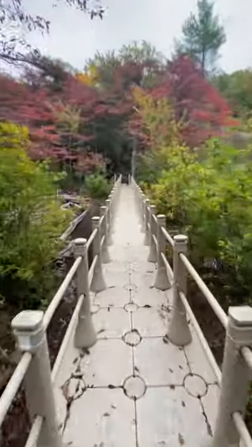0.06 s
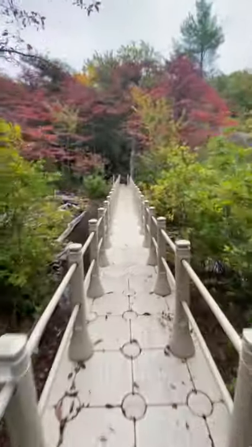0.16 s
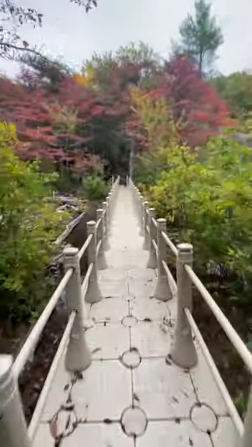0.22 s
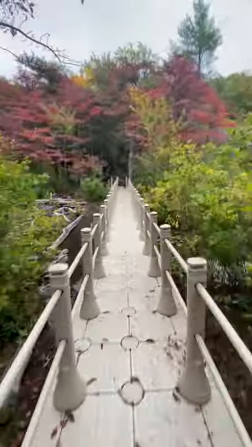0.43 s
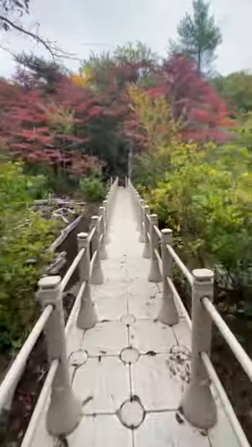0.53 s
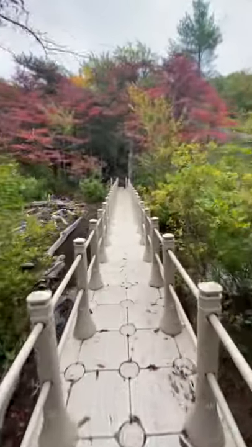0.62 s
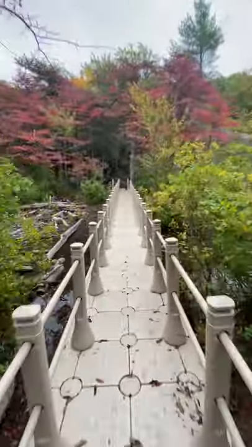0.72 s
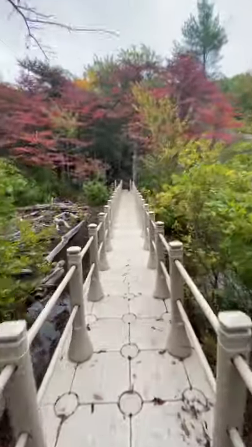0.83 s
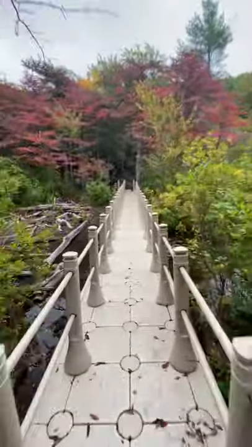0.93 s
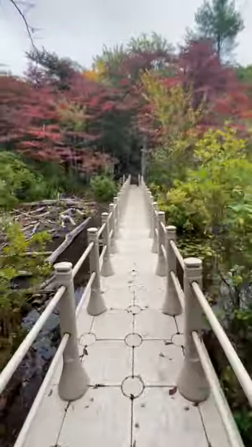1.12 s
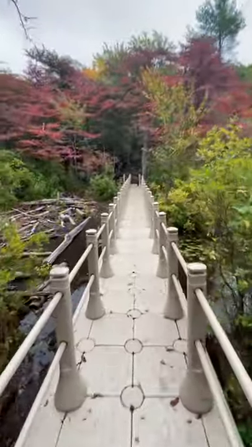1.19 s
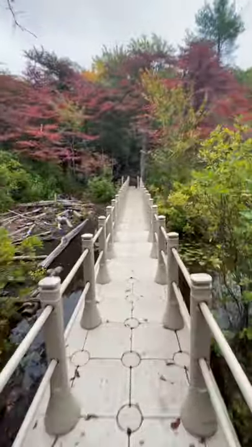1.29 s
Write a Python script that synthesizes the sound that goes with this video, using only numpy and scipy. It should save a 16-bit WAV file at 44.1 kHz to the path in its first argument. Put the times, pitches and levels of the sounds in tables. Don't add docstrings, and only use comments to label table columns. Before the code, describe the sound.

Soft footsteps thump on a hollow floating walkway while crickets trill steadily in the woods

```python
import sys
import numpy as np
from scipy import signal
from scipy.fft import rfft, irfft, next_fast_len
from scipy.io import wavfile
from scipy.ndimage import map_coordinates

SR = 44100
rng = np.random.default_rng(int(sys.argv[2]) if len(sys.argv) > 2 else 0)


def log_audio(samples):
    frames = np.atleast_2d(samples).T
    limited = np.clip(frames, -1, 1)
    pcm = np.round(limited * 32767).astype(np.int16)
    wavfile.write(sys.argv[1], SR, pcm)


def gain_from_db(level_db):
    decades = np.asarray(level_db, float) / 20
    return 10 ** decades


N = 59535


def unit(x):
    return x / np.sqrt(np.mean(x ** 2) + 1e-20)


def along(points, hz):
    point_hz, value = np.transpose(points)
    return np.interp(np.log(hz + 1), np.log(point_hz + 1), value)


def curve(rows):
    return np.interp(np.arange(N) / SR, *np.transpose(rows))


def wobble(rate):
    knots = rng.standard_normal(int(N * rate / SR) + 4)
    return map_coordinates(knots, [np.arange(N) * rate / SR])


def rush(spectrum, alike):
    m = next_fast_len(N + 8192)
    hz = np.fft.rfftfreq(m, 1 / SR)
    turn = np.arccos(np.clip(along(alike, hz), -1, 1)) / 2
    gain = gain_from_db(along(spectrum, hz)) * (hz >= spectrum[0][0] / 2)
    noise = rfft(rng.standard_normal((2, m)))
    mid, side = irfft(noise * gain * [np.cos(turn), np.sin(turn)], m)[:, :N]
    return unit(np.array([mid + side, mid - side]))


def add(out, start_s, sound):
    part = out[..., max(round(start_s * SR), 0):][..., :sound.shape[-1]]
    part += sound[..., :part.shape[-1]]


def pan(db):
    return gain_from_db([[db / 2], [-db / 2]])


def ring(hz, t60, rise_s):
    t = np.arange(SR // 2) / SR
    return gain_from_db(-60 * t / t60) * (1 - np.exp(-t / rise_s)) * np.sin(2 * np.pi * hz * t)


def swell(start_s, length_s, db):
    u = np.maximum(np.arange(N) / SR - start_s, 0) / length_s
    return gain_from_db(db + 9) * 5.1 * u * np.exp(-4.5 * u)


# hz, level_db
AIR_COLOUR = [(200, -36), (420, -3.5), (900, -14), (1300, -18), (1600, -8), (1900, -15), (3000, -20),
              (6000, -36)]
# time_s, level_db
AIR_LEVEL = [(0, -63), (.08, -73.5), (.18, -79), (.4, -70), (.66, -62), (1.05, -66.5), (1.15, -73.5),
             (1.28, -75.5), (1.35, -63)]
# hz, likeness (-1 to 1)
DISTANT_ALIKE = [(100, -0.47), (1000, 0.049), (3000, 0.12), (9000, 0.38), (14000, -1.8)]
# hz, level_db
RUMBLE = [(30, -14), (60, 0.5), (170, 1), (280, -13.5), (600, -47)]


def air():
    wash = gain_from_db(curve(AIR_LEVEL) + wobble(20.5)) * rush(AIR_COLOUR, DISTANT_ALIKE)
    rumble_level = gain_from_db(-61 + 2.5 * wobble(19.9))
    return wash + rumble_level * rush(RUMBLE, [(40, 0.69), (120, 0.67)])


def strokes(times, level_db, hz, fall_hz, length_s, side_db):
    out = np.zeros((2, N))
    t = np.arange(round(length_s * SR)) / SR
    u = t / length_s
    bend = 1.353
    swell_and_fade = np.sin(np.pi * np.sqrt(u)) ** 4
    luck = rng.standard_normal((len(times), 4))
    for s, db, f, (pitch, level, lag, side) in zip(times, level_db, hz, luck):
        cycles = (f + 30 * pitch) * t - fall_hz * t * u ** bend / (1 + bend)
        phase = np.array([[0], [1.18 + 0.55 * lag]]) + 9 * side
        tone = np.sin(2 * np.pi * cycles + phase)
        add(out, s, gain_from_db(db + level) * pan(side_db + side) * swell_and_fade * tone)
    return out


# hz, level_db
CHORUS = [(900, -76), (2200, -25), (4300, -22.5), (5400, -13), (6010, -2.5), (7000, -19), (8200, -38.5),
          (9800, -46), (13500, -100)]
# time_s, level_db
TRILL = [(0, -54.5), (.13, -55), (.25, -61), (.4, -56.5), (.72, -59), (.85, -62.5), (1.05, -65.5),
         (1.17, -62), (1.35, -65)]
# start_s, peak_db
CHIRPS = [(0.0405, -46.5), (0.0775, -45), (0.1141, -46.5), (0.1391, -47.5), (0.177, -46.5), (0.2108, -48),
          (0.2473, -65), (0.2737, -47), (0.3121, -47), (0.3407, -42.5), (0.3814, -43.5), (0.407, -44),
          (0.4419, -54), (0.4718, -53), (0.5072, -47.5), (0.5434, -45), (0.5807, -45.5), (0.617, -44),
          (0.642, -45), (0.6801, -44.5), (0.7058, -53), (0.7447, -56), (0.8098, -45.5), (0.871, -52),
          (0.8887, -48.5), (0.9112, -49), (0.9373, -48), (0.9752, -48.5), (1.0009, -49.5), (1.0397, -46.5),
          (1.066, -49.5), (1.1067, -46.5), (1.1334, -47), (1.1688, -43.5), (1.2027, -44.5), (1.2401, -60),
          (1.2661, -45.5)]


def crickets():
    first_s, strokes_per_s = .0126, 58.1
    times = np.arange(first_s, N / SR, 1 / strokes_per_s)
    trill_db = np.interp(times, *np.transpose(TRILL)) + 3
    trill = strokes(times - .002, trill_db, 5380 + 0 * times, fall_hz=1120, length_s=0.0149, side_db=-3.5)

    s, db = np.transpose(CHIRPS)
    near = strokes(s - .001, db - 2.5, 6360 + 0 * s, fall_hz=1400, length_s=0.0141, side_db=-5.5)

    when, loud, high = rng.random((260, 3)).T
    crowd = strokes(when * N / SR, -64 + 6 * loud, 6000 + 450 * high, fall_hz=800, length_s=.012, side_db=-8.5)

    chorus = gain_from_db(-60 + 1.7 * wobble(14.13)) * rush(CHORUS, DISTANT_ALIKE) * pan(-0.54)
    return trill + near + crowd + chorus


# start_s, length_s, level_db
RUSTLES = [(.52, .07, -77), (.234, .025, -65), (.712, .035, -66), (.745, .06, -73), (.794, .022, -64),
           (.925, .04, -73)]
# hz, level_db
CLOTH = [(7000, -40), (8500, -14), (10500, -6), (11500, -10), (12800, -10), (14000, -26), (15300, -15),
         (16500, -78)]
# start_s, level_db, pitch_hz, t60_s
SQUEAK = (.947, -60, 10050, .06)


def clothing():
    s, db, hz, t60 = SQUEAK
    squeak = np.zeros((2, N))
    add(squeak, s, gain_from_db(db) * pan(0) * (ring(hz, t60, .004) + ring(0.9 * hz, t60, 0.0041)) / 2)
    rubbing = sum(swell(*row) for row in RUSTLES)
    return squeak + rubbing * rush(CLOTH, [(9000, 0.073), (11000, -0.051), (13000, -0.87)])


# start_s, length_s, level_db, brightness (0-1)
SCUFFS = [(0.188, 0.033, -50.5, 0.03), (0.222, 0.029, -60, 0.3), (0.237, 0.021, -54.5, 0.54),
          (0.244, 0.028, -46.5, 0.07), (0.262, 0.082, -54.5, 0.07), (0.319, 0.059, -65.5, 0.72),
          (0.717, 0.033, -61.5, 0.7), (0.722, 0.034, -51.5, 0), (0.739, .12, -63.5, 0.04),
          (0.986, 0.11, -60, 0.01), (1.337, 0.033, -58, 0.06)]
# hz, level_db
DULL = [(150, -6.5), (400, -0.5), (1000, -5.5), (2000, -11), (4000, -23), (8000, -53), (14000, -70)]
# hz, level_db
BRIGHT = [(800, -72), (2000, -10), (4500, -10.5), (7500, -14.5), (10500, -29.5), (13000, -30), (16000, -39)]


def sole():
    dull, bright = np.zeros(N), np.zeros(N)
    for s, length_s, db, brightness in SCUFFS:
        share = np.clip(brightness, 0, 1)
        rub = swell(s, length_s, db)
        dull += np.sqrt(1 - share) * rub
        bright += np.sqrt(share) * rub
    grit = gain_from_db(2.9 * wobble(250))
    scuff = dull * rush(DULL, [(300, 0.68), (2000, 0.47)]) * pan(1.0)
    scuff = scuff + bright * rush(BRIGHT, [(3000, 0.91), (9000, 0.49), (13000, -0.72)])
    return grit * scuff


# start_s, peak_db, pitch_hz, t60_s
TICKS = [(0.1885, -58, 800, 0.0058), (0.1891, -50, 2200, .01), (.1955, -44.5, 2290, .008),
         (0.197, -64, 950, 0.0065), (0.2293, -34.5, 2020, 0.009), (.2305, -37, 3700, 0.0054),
         (0.238, -38, 3240, 0.011), (.2425, -44, 2140, .01), (0.247, -39, 2320, 0.0072),
         (0.2503, -36, 3280, 0.0075), (0.254, -37, 2480, 0.0071), (.258, -40, 1820, 0.0071),
         (.263, -36, 2020, 0.01), (0.2902, -48, 1580, 0.0078), (0.3356, -40.5, 2860, 0.0089),
         (0.7126, -49.5, 2500, 0.015), (0.7264, -40, 1748, 0.0078), (.7262, -42, 754, 0.007),
         (0.7325, -40, 1840, 0.012), (.738, -42, 1170, 0.0091), (.7395, -43, 1950, .01),
         (0.7657, -46, 1890, 0.0049), (0.772, -45, 1810, .005), (0.8166, -49, 1790, 0.014),
         (.8532, -39.5, 2890, 0.0089), (.8536, -48, 1980, 0.014), (0.875, -49.5, 1030, 0.0068),
         (0.9156, -38.5, 2220, 0.01), (.9158, -41.5, 4460, .004), (0.9182, -43, 1310, 0.0047),
         (.9712, -42.5, 1400, 0.0036), (0.9717, -48, 2800, 0.0025), (0.9916, -40, 2650, 0.0089),
         (0.9929, -44, 850, 0.012), (.9965, -45.5, 2730, 0.015), (0.9999, -51, 1210, 0.0094),
         (1.048, -51.5, 2850, .005), (1.1737, -54, 2080, 0.013), (1.309, -51.5, 1930, 0.012),
         (1.3335, -45.5, 1930, 0.0099), (1.336, -47, 1760, 0.012)]
# hz, level_db
CRACK = [(300, -25), (700, -2), (1100, 0), (2400, -2), (3500, -12), (6000, -30), (14000, -80)]


def joints():
    pinging, crack_level = np.zeros(N), np.zeros(N)
    t = np.arange(SR // 10) / SR
    crack_rise = 1 - np.exp(-t / 0.0004)
    luck = rng.standard_normal((len(TICKS), 2))
    for (s, db, hz, t60), spread in zip(TICKS, luck):
        neighbours = sum(ring(hz * np.exp(.14 * k), t60, 0.00087) for k in spread)
        pings = ring(hz, t60, 0.00022) + 0.67 * ring(hz, t60 / 4, .0001) + 0.37 * neighbours
        add(pinging, s, gain_from_db(db - 2.5) * pings)
        add(crack_level, s, gain_from_db(db - 8 - 60 * t / (1.85 * t60)) * crack_rise)
    return pinging * pan(.8) + crack_level * rush(CRACK, [(1000, 0.24)])


# start_s, level_db, pitch_hz, t60_s
KNOCKS = [(.189, -42.5, 800, 0.05), (.195, -49, 960, 0.1), (0.2, -42.5, 294, 0.23),
          (0.2509, -28, 278, 0.091), (.258, -34, 670, 0.035), (.305, -39, 299, 0.11),
          (0.724, -44.5, 472.6, 0.14), (.65, -57, 380, 0.069), (.69, -54, 267, 0.11),
          (0.72, -42, 1070, 0.041), (.36, -49, 265, 0.11), (0.744, -44.5, 283, 0.072),
          (.82, -48, 500, 0.03), (.33, -45, 191.5, 0.14), (0.41, -55.5, 280, .08), (0.819, -31, 225, 0.046),
          (.918, -41.5, 283.4, 0.12), (1.03, -48, 488, 0.036), (1.3, -50.5, 594, .04),
          (.92, -44.5, 780, 0.034), (.3, -45.5, 165, .12), (1.334, -42.5, 540, 0.033)]
# start_s, level_db, pitch_hz, t60_s
CLACK = (.2483, -18.5, 1900, .016)
# hz, left_over_right_db
DECK_PAN = [(100, -10), (290, 3.5), (700, 15.5), (1400, 0)]


def deck():
    out = np.zeros((2, N))
    rise_s = .0025
    for s, db, hz, t60 in KNOCKS + [CLACK]:
        knock = ring(hz, t60, rise_s) + 0.12 * ring(1.13 * hz, t60, rise_s)
        add(out, s, gain_from_db(db) * pan(along(DECK_PAN, hz)) * knock)
    return out


# start_s, level_db, pitch_hz, t60_s
THUMPS = [(.001, -32, 90.5, 0.074), (.197, -43.5, 100, 0.21), (0.257, -20.5, 94.6, 0.18),
          (0.319, -41.5, 74.6, 0.17), (0.367, -39, 97.3, 0.22), (0.7386, -30, 98.4, 0.24),
          (0.7903, -19, 87, 0.025), (0.823, -22.5, 101, 0.085), (0.8522, -29.5, 96.4, 0.21),
          (0.898, -47, 109.4, 0.22), (0.9117, -26, 93, 0.15), (1.007, -47.5, 90.5, 0.52),
          (1.269, -40, 73, 0.17), (1.311, -57, 81.6, 0.18)]
# time_s, strength_db
LOAD = [(0, -47), (.06, -96), (.18, -100), (.19, -54), (.26, -43), (.36, -60.5), (.7, -70), (.73, -50.5),
        (.92, -49), (.97, -65), (1.04, -60), (1.15, -64), (1.26, -64), (1.35, -51.5)]
# hz, level_db
BODY = [(25, -32), (50, 6), (90, -3), (150, -2.5), (280, -7.5), (500, -8.5), (1000, -22.5), (2500, -59),
        (8000, -100)]


def floats():
    out = np.zeros((2, N))
    rise_s = .0045
    lag = 130
    for s, db, hz, t60 in THUMPS:
        sway = gain_from_db(-5) * ring(0.613 * hz, 0.77 * t60, rise_s)
        late_sway = np.pad(sway, (lag, 0))[:len(sway)]
        thump = ring(hz, t60, rise_s) + np.array([sway, late_sway])
        add(out, s, gain_from_db(db - 3) * pan(0.94) * thump)
    lumps = gain_from_db(curve(LOAD) + 3.13 * wobble(39.57))
    return out + lumps * rush(BODY, [(50, 0.55), (200, 1.0), (600, 0.14)]) * pan(5.8)


def scene():
    return air() + crickets() + clothing() + sole() + joints() + deck() + floats()


def top_cut(x):
    return signal.sosfilt(signal.butter(12, 15790, fs=SR, output="sos"), x)


def record(dry):
    low_hz = 44.6
    m = next_fast_len(N + 8192)
    f = 1j * np.fft.rfftfreq(m, 1 / SR) / low_hz
    high_pass = (f * f / (f * f + 0.84 * f + 1)) ** 2
    heard = irfft(rfft(dry, m) * high_pass, m)[:, :N]
    return top_cut(heard)


dry = scene()
out = record(dry)
log_audio(out)
```